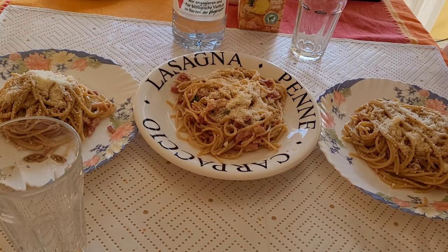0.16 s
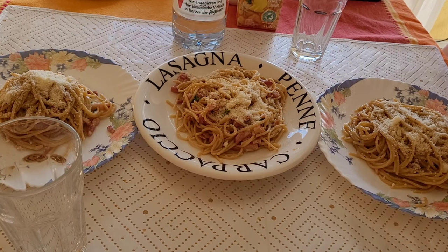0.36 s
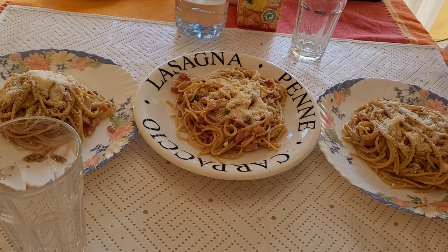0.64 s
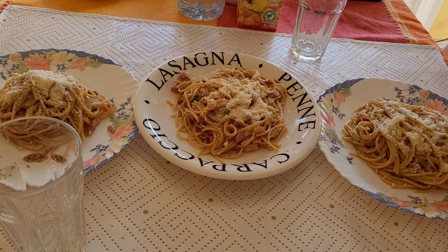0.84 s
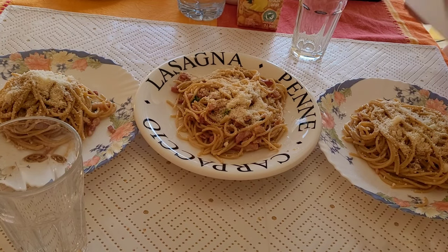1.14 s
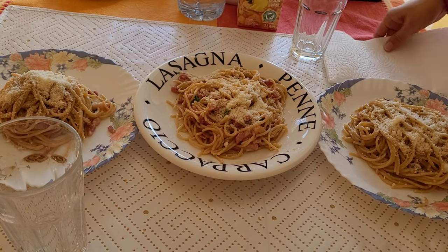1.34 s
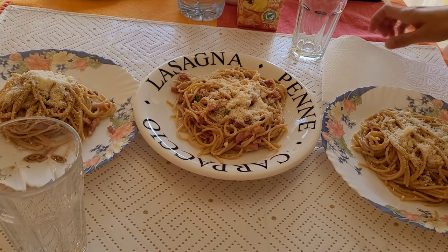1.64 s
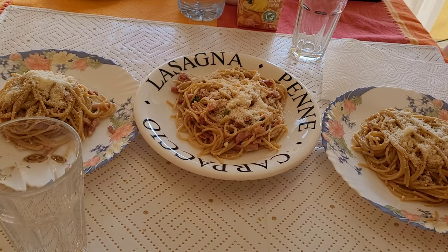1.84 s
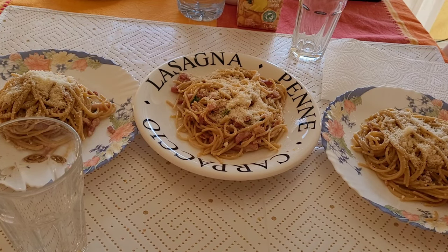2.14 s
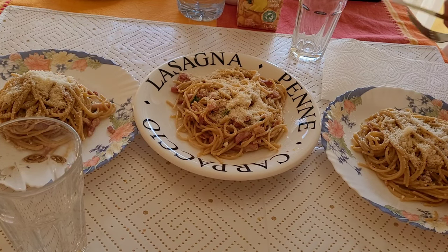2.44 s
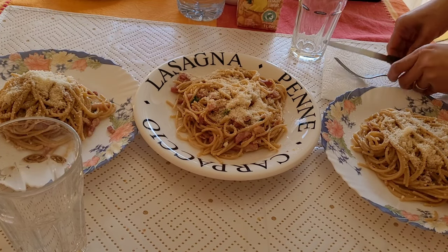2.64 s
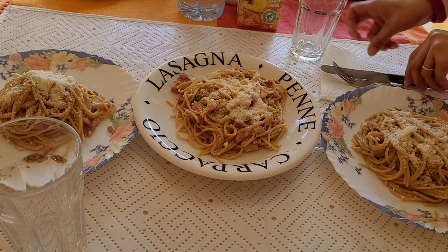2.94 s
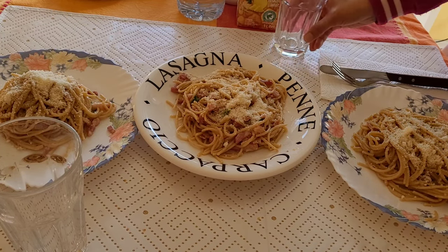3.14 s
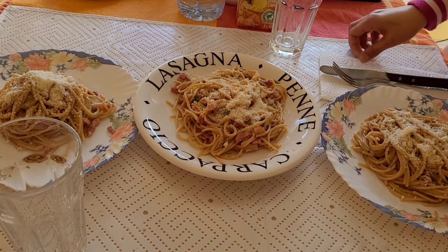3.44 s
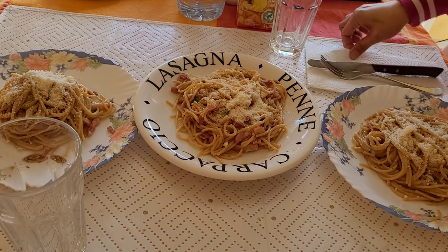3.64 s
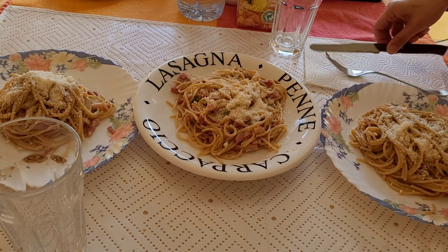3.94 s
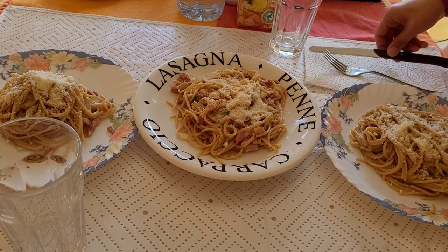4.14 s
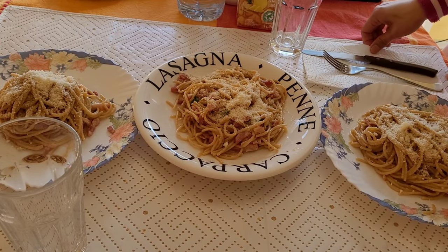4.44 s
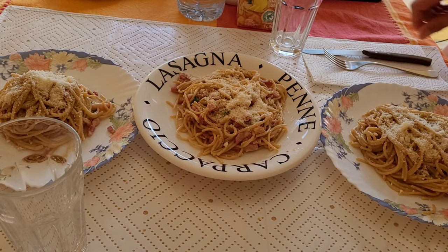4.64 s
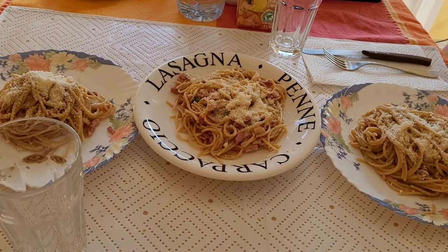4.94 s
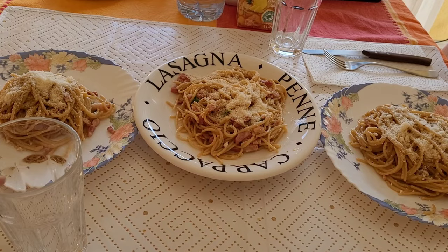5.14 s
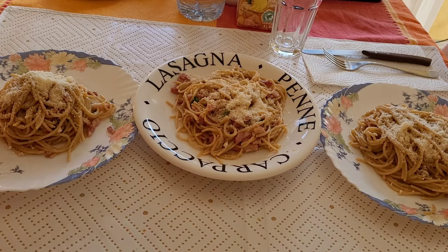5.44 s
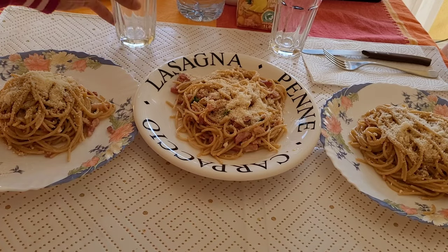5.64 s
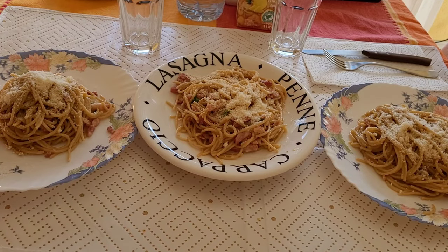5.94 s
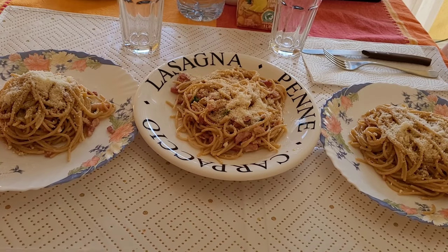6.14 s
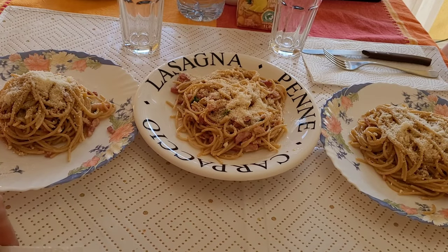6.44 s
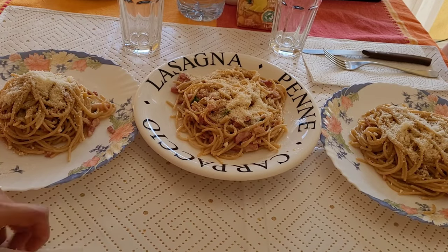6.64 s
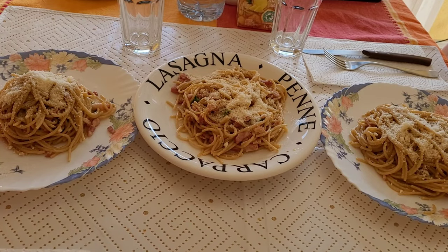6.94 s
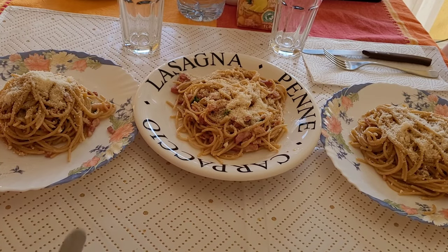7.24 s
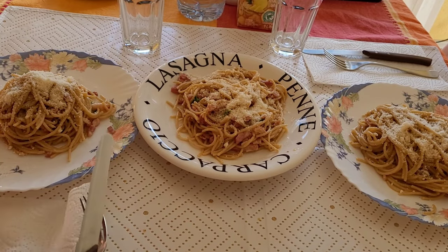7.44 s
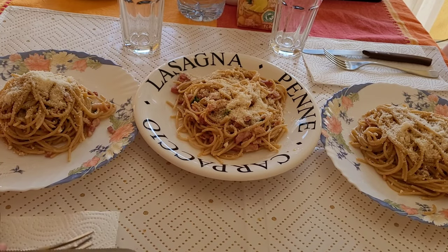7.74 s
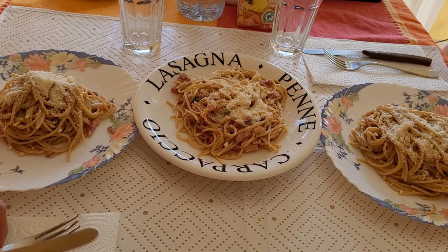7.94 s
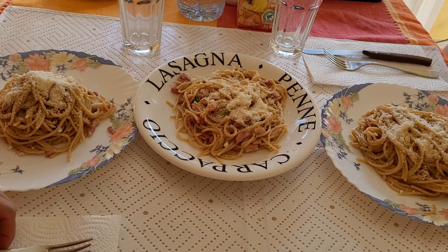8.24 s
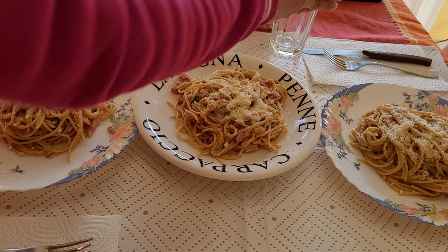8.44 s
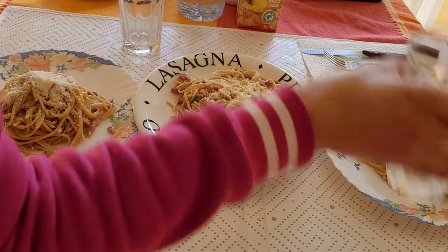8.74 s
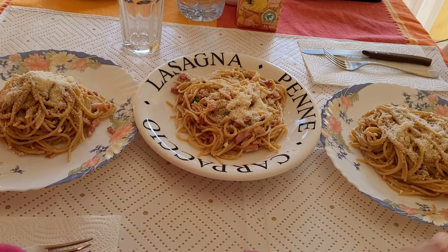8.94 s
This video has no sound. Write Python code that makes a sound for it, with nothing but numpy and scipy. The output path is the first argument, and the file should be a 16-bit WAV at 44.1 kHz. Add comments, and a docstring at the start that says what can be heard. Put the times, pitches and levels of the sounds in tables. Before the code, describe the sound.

Close in a quiet kitchen, a table is laid: soft thuds, paper napkin rustles, cutlery clinks, and one heavy glass thump near the middle.

```python
"""A quiet kitchen, where a table is laid close to a phone with two microphone ports. Knives and forks clink
and chatter, with short dry clinks of a glass near 6 s: runs of tiny knocks excite decaying modes. Glasses and
hands thud: soft pushes ring the modes of a cloth-covered table top. Napkins and sleeves rustle as grainy noise,
with cracks, faint squeaks and one soft low bump. A small furnished room answers the hits with a brief decaying
echo, over a low appliance hum and microphone hiss."""
import sys
import numpy as np
from scipy import signal
from scipy.fft import rfft, irfft, next_fast_len
from scipy.io import wavfile
from scipy.ndimage import uniform_filter1d

SR = 44100
rng = np.random.default_rng(int(sys.argv[2]) if len(sys.argv) > 2 else 0)


def master(y):
    """Save y as 16-bit WAV."""
    cut = np.clip(np.atleast_2d(y).T, -1, 1)
    pcm = np.round(cut * 32767)  # scale
    wavfile.write(sys.argv[1], SR, pcm.astype(np.int16))


N = 400866
ECHO_AND_LAST_THUD_END_S = 8.999  # both stop short here

# path of the hands, far setting on the right first, then near on the left:
# [t/s, lag of left/ms, left minus right level/dB]
HAND_PATH = [(0, 0.23, -2), (1.2, 0.26, -2), (1.8, 0.22, -5), (2.25, 0.41, -1), (2.7, 0.15, -2.5),
             (4.099, 0.047, 3), (4.502, -0.27, -1.5), (5.702, -0.15, 3), (6.05, -0.35, 7),
             (6.8, -0.28, 5.5), (7.7, -0.45, 7), (7.87, -0.13, 6), (8.071, -.22, 7.5), (9.09, -.1, -1)]
# spectrum of things dragging or shuddering on the table: [f/Hz, level/dB per Hz]
DRAG_SPECTRUM = [(80, -15), (140, -9), (260, 2.5), (450, -2.5), (800, -13), (1200, -22.5)]


def undb(db):
    """Decibel law: level in dB to amplitude gain."""
    return 10 ** (np.asarray(db) / 20)


def unit(x):
    """Normalisation to a root-mean-square value of 1."""
    return x / np.sqrt(np.mean(x ** 2))


def colour(x, points):
    """Linear filtering: shape the spectrum of x by (f/Hz, level/dB) points, joined over log frequency."""
    hz, db = np.transpose(points)
    size = next_fast_len(x.shape[-1])
    f = np.maximum(np.fft.rfftfreq(size, 1 / SR), 1)
    gain = undb(np.interp(np.log(f), np.log(hz), db, -120, -120))
    return irfft(rfft(x, size) * gain, size)[..., :x.shape[-1]]


def hump(hz, octaves):
    """Band-limited spectrum: a bell over log frequency, 6 dB down one width from its centre."""
    width = max(octaves, .03)
    return [(hz * 2 ** (k * width), -6 * k ** 2) for k in range(-3, 4)]


def fade(t, t60_ms):
    """Exponential damping: 60 dB of decay in t60."""
    return np.exp(-np.log(1000) * t * 1000 / max(t60_ms, 3))


def rings(modes, t, share):
    """Modal superposition: one damped sine a mode, ringing for a share of its free time."""
    hz, db, t60 = np.transpose(modes)[:, :, None]
    damping = np.exp(-np.log(1000) * t / (t60 * share))
    return undb(db) * np.sin(2 * np.pi * hz * t) * damping


def flicker(rate, depth_db):
    """Random modulation: gain that glides between independent random levels, rate steps a second."""
    k = int(SR / rate)
    steps = np.repeat(rng.standard_normal(N // k + 1), k)
    return undb(depth_db * uniform_filter1d(steps, k)[:N])


def knocking(t, rise_ms, chatter_ms, tail_ms):
    """Repeated impact: a run of tiny knocks as a force, and as a broad crack with its tail at both ports."""
    rise = max(rise_ms, .1) / 1000
    knocks = rng.standard_normal((2, len(t))) * undb(2.83 * rng.exponential(size=len(t)))
    release = 1 + np.exp(np.clip((t - rise - chatter_ms / 1000) / .001, -50, 50))
    contact = np.minimum(t / rise, 1) ** 2 / release
    tail = undb(-15.5) * (t > rise) * fade(t - rise, tail_ms)
    # the two ports hear partly related cracks
    ports = np.array([knocks[0], 0.35 * knocks[0] + 1.26 * knocks[1]])
    return knocks[0] * contact, ports * np.maximum(contact, tail)


def add(out, x, s, peak_db, share=1):
    """Time and level difference between ports: mix x (2 x n) in at time s, from where the hands are."""
    at, lag_ms, pan_db = np.transpose(HAND_PATH)
    half_lag = share * np.interp(s, at, lag_ms) / 2000  # s
    pan = share * np.interp(s, at, pan_db)
    x = x * undb(peak_db + np.array([[pan], [-pan]]) / 2) / np.abs(x.mean(axis=0)).max()
    for c, start in enumerate((s + half_lag, s - half_lag)):
        i = int(start * SR)
        out[c, i:i + x.shape[1]] += x[c, :N - i]


def room(x):
    """Diffuse reverberation: octave bands of noise, each dying at its own rate, different at each port."""
    # reverberation time of the room: [f/Hz, t60/s]
    decay = [(150, 0.2), (1000, 0.22), (4000, 0.22), (12000, 0.11)]
    echo_db = -10
    t, (hz, t60) = np.arange(int(.4 * SR)) / SR, np.transpose(decay)
    tail = 0
    for f in 90 * 2. ** np.arange(8):
        octave = signal.butter(2, [f / 2 ** .5, f * 2 ** .5], "band", fs=SR, output="sos")
        band = signal.sosfilt(octave, rng.standard_normal((2, len(t))))
        band += max(1 - f / 700, 0) * (band[::-1] - band) / 2  # long waves reach both ports alike
        tail = tail + band * fade(t, 1000 * np.interp(np.log(f), np.log(hz), t60))
    tail *= np.minimum(t / 0.0071, 1) ** 2  # the echo builds up
    tail /= np.sqrt(np.sum(tail ** 2) / 2)
    wet = signal.fftconvolve(x.mean(axis=0)[None], tail)[:, :N]
    return undb(echo_db) * wet * (np.arange(N) / SR < ECHO_AND_LAST_THUD_END_S)


def quiet():
    """Stationary noise: hiss, unrelated at the ports but alike in the bass; resonance: a wavering hum."""
    # spectrum of the hiss: [f/Hz, level/dB per Hz]
    hiss_spectrum = [(12, -40), (20, -3), (86, 9.5), (168, -12.5), (301, -6), (499, -14), (1570, -27),
                     (2020, -36.5), (4940, -37), (7520, -9.5), (8890, -36), (14700, -33.5), (16000, -34)]
    # course of the hum: [t/s, level/dB]
    hum_course = [(0, -80), (.55, -90), (.9, -78.5), (1.3, -71), (2.902, -76.5), (3.24, -60),
                  (3.498, -75.5), (4.961, -73), (5.67, -77), (6.6, -86.5), (6.911, -78), (7.62, -83),
                  (8.101, -71.5), (9.09, -77.5)]
    hiss_db, hum_hz, hum_width_hz = -74, 94.5, 20
    mid, side = colour(rng.standard_normal((2, N)), hiss_spectrum)
    side = signal.sosfilt(signal.butter(1, 350, "high", fs=SR, output="sos"), side)
    hiss = undb(hiss_db) * unit(mid + side * np.array([[1], [-1]]))
    b, a = signal.iirpeak(hum_hz, hum_hz / hum_width_hz, SR)
    hum = unit(signal.lfilter(b, a, rng.standard_normal(N)))
    s, db = np.transpose(hum_course)
    return hiss + hum * undb(np.interp(np.arange(N) / SR, s, db))


def rubbing(t):
    """Energy addition: gains of scuff, paper, hiss and drag, as each rub rises, holds and dies away."""
    # napkins, sleeves and hands rubbing: [start t/s, length/s, relative level/dB, change to the end/dB,
    # fineness (0 scuff, 1 paper, 2 hiss), drag on the table relative to the rub/dB]
    rubs = [(0, 0.03, -83, -2.5, .8, 19), (0.135, 0.23, -87.5, 7.5, .9, 15), (0.26, 0.025, -74, -7, 1.9, 3),
            (0.425, .06, -78, -10, .6, 6), (0.502, 0.04, -60.5, -13, 1.7, -11),
            (0.62, .13, -71.5, -0.5, .4, -5), (0.767, 0.053, -72, -7.5, 1.3, 5),
            (1.113, 0.15, -87, 10, .9, 9.5), (1.3, 0.14, -60.5, -19.5, .8, -9),
            (1.457, 0.11, -76.5, 0, 1.4, -12), (1.556, 0.11, -72.5, 1.5, .9, -15),
            (1.911, 0.086, -73, 8, 1.8, 8.5), (2.224, 0.065, -91, -5, .9, 9.5),
            (2.394, 0.027, -95, 1.5, 1.1, -14), (2.569, 0.11, -84.5, 5.5, 1.3, 2.5),
            (2.742, 0.084, -66.5, -15, 1.6, -13), (2.882, .12, -58, -11.5, 1.4, -19),
            (3.09, 0.058, -71, 3, 1.9, 0), (3.141, .12, -57.5, -15.5, 1.4, 1),
            (3.31, 0.089, -78.5, 3.5, 1.9, 3.5), (3.402, 0.1, -72.5, 1.5, 1.2, -4),
            (3.527, 0.16, -67, -2.5, 1.2, -1), (3.692, 0.061, -65.5, -7, 0.53, -13),
            (3.856, 0.084, -71.5, -4.5, .3, -12), (4.225, 0.07, -84, 7, 2.1, -3),
            (4.364, 0.08, -77.5, -2, 1.3, -10), (4.493, 0.18, -71, -2, 1.5, -1.5),
            (4.835, 0.097, -73, 8.5, .4, -11), (4.929, 0.084, -61.5, -1.5, .7, 4.5),
            (5.089, 0.053, -52.5, -6, 1.4, 9), (5.168, 0.15, -68, -6.5, .8, 7.5),
            (5.409, 0.099, -52, -15, 1.1, 5), (5.703, .12, -64.5, -14, 1.1, 6),
            (5.891, 0.071, -77, 2, .4, 2.5), (6.017, .2, -68.5, -1.5, .9, 2.5), (6.251, .13, -64, 1, .8, 1),
            (6.413, 0.056, -78, 4.5, 0.87, -3), (6.488, 0.1, -67, 9.5, 1.2, -19),
            (6.618, 0.067, -70, 12.5, 1.5, -13.5), (6.701, 0.04, -57, 0.5, 1.1, -2.5),
            (6.802, .11, -57.5, -2.5, 1.7, -5.5), (6.942, 0.087, -64, 5, 1.2, -11),
            (7.041, 0.16, -62, -2.5, 1.6, -13), (7.204, 0.043, -64, 5, .7, -9.5),
            (7.281, 0.088, -67, -10, 0.11, -11), (7.47, 0.083, -73.5, -7.5, .9, 1.5),
            (7.577, 0.27, -74.5, -2.5, 1.2, -4), (7.393, 0.066, -86, -1, 0.35, -1.5),
            (8, 0.083, -70.5, 21, 1.27, -1), (8.12, 0.13, -69, -7.5, 1.8, -10),
            (8.42, 0.15, -76.5, 1, 1.9, 2)]
    # relative level while nothing is handled: scuff, paper, hiss, drag [level/dB]
    still_db = (-93, -93.5, -85, -84)
    attack_db_s, release_db_s = 900.5, 454.5  # slopes of the flanks, dB per s
    spread_db = 5.5  # loss one step of fineness away
    power = undb(still_db)[:, None] ** 2 + 0 * t
    for s, length, db, change_db, fineness, drag_db in rubs:
        length = max(length, .01)
        shape = db + change_db * np.clip((t - s) / length, 0, 1)
        shape -= attack_db_s * np.maximum(s - t, 0)
        shape -= release_db_s * np.maximum(t - s - length, 0)
        mix = np.append(-spread_db * (fineness - np.arange(3)) ** 2, drag_db)
        power = power + undb(mix[:, None] + shape) ** 2
    return np.sqrt(power)


def moves():
    """Sliding friction: paper and cloth rub as dense grains, and drag on the table as partly shared noise."""
    # spectra of the rubbing, coarse to fine: [f/Hz, level/dB per Hz]
    scuff_spectrum = [(550, -13), (900, 1), (1400, 4), (2100, 2.5), (3000, -21.5)]
    paper_spectrum = [(1700, -18), (2600, -3.5), (4000, -2.5), (6000, -10), (8000, -13)]
    fine_spectrum = [(4000, -11.5), (6500, -2), (7800, 3.5), (10000, 3), (13000, 3.5), (16000, -6.5)]
    t, (at, _, pan_db) = np.arange(N) / SR, np.transpose(HAND_PATH)
    coarse_t = t[::128]
    scuff, paper, fine, drag = (np.interp(t, coarse_t, gain) for gain in rubbing(coarse_t))
    pan_db = np.interp(t, at, pan_db)
    # exponentially distributed levels make the noise grainy
    grains = rng.standard_normal((2, N)) * undb(1.4 * rng.exponential(size=N)) * flicker(60, 3.2)
    scuff = scuff * unit(colour(grains, scuff_spectrum)) * flicker(29, 4.0)
    paper = paper * unit(colour(grains, paper_spectrum)) * flicker(18, 3.0)
    fine = fine * unit(colour(grains, fine_spectrum))
    mid, side = colour(rng.standard_normal((2, N)), DRAG_SPECTRUM)
    drag = drag * unit(mid + 0.77 * side * np.array([[1], [-1]])) * flicker(25, 5.4)
    panned = undb(6.5 + 0.41 * np.array([pan_db, -pan_db]) / 2)
    return (scuff + paper + fine) * panned + drag


def crackles():
    """Noise bursts: broad cracks and scrapes without a ring, and narrow-band squeaks with one soft low bump."""
    # dry cracks and scrapes, mostly paper napkins:
    # [t/s, peak level/dB, rise/ms, chatter/ms, centre f/Hz, width/octaves]
    cracks = [(1.122, -56, 2.3, 38, 684, 1), (1.241, -46, 1.1, 4, 5250, 1.3),
              (1.309, -31, 0.65, 3.1, 4930, 3.1), (1.328, -39, 3, 8.4, 2400, .62),
              (1.394, -49, 2.1, 6.5, 7000, .45), (2.02, -30, 12, 18, 2250, 0.95),
              (3.235, -45, 4, 19, 1040, 0.83), (3.313, -47, .63, 7.2, 7850, 0.78),
              (3.555, -37.5, 3.9, 37, 6930, 0.97), (4.507, -35, 1.3, 13, 8200, 0.66),
              (6.449, -46.5, 1.8, 8.8, 1460, 0.72), (6.725, -24, .92, 27, 3140, 0.52),
              (6.731, -24, .36, .82, 3900, 3.4)]
    # faint short squeaks, and one soft low bump at 274 Hz: [t/s, peak level/dB, length/ms, centre f/Hz]
    narrow_bursts = [(0.141, -59, 38, 1090), (0.838, -63, 59, 978), (3.911, -48, 8.1, 2200),
                     (3.952, -50, 32, 2080), (4.301, -61.5, 14, 274), (4.51, -63, 18, 713),
                     (4.608, -61, 28, 997), (4.709, -67, 21, 970), (6.063, -51.5, 6, 2900),
                     (6.498, -53.5, 49, 3000)]
    crack_t60_ms = 180
    narrow_rise_ms, narrow_t60_ms, narrow_octaves = 6.14, 45, 0.073
    out, t = np.zeros((2, N)), np.arange(int(.2 * SR)) / SR
    for s, db, rise_ms, chatter_ms, hz, octaves in cracks:
        _, crack = knocking(t, rise_ms, chatter_ms, crack_t60_ms)
        add(out, colour(crack, hump(hz, octaves)), s - rise_ms / 2000, db)
    for s, db, ms, hz in narrow_bursts:
        _, burst = knocking(t, narrow_rise_ms, ms, narrow_t60_ms)
        add(out, colour(burst, hump(hz, narrow_octaves)), s - narrow_rise_ms / 2000, db)
    return out


def thuds():
    """Plate bending: a soft push rings the table top, the thing settles with a low shudder, the cloth slaps."""
    # things landing on the table: [t/s, peak level/dB, push/ms, share of the free ringing time,
    # settling relative to the ring/dB, cloth slap relative to the ring/dB]
    landings = [(0.155, -53, 4.4, 0.55, 1.5, -23), (0.189, -47, 1.5, 1, -23, -36),
                (.256, -51.5, 3.4, .6, 3, -23), (.3, -49, 5.5, .41, -16, -28),
                (0.376, -34.5, 3.4, 0.77, 22, -18), (.49, -28, 2.9, 0.81, -25, -19.5),
                (0.514, -29, 3.35, 0.59, -24.5, -18), (0.696, -48.5, 4.2, .95, -10.5, -16),
                (0.908, -60, 2.5, 0.55, -30, -4), (1.392, -53, 7.5, 0.9, -29, -25),
                (1.531, -52.5, 5.3, 1, -26, -23), (1.781, -50, 0.73, .95, -4.5, -18),
                (1.945, -42.5, 0.91, 1, -11, -9), (2.012, -42, 2.46, 0.55, 3, -10),
                (2.053, -30, 2, 0.61, 5, -22.5), (2.091, -19.5, 1.3, 0.35, 4.5, -2.5),
                (2.161, -42, 1.4, 0.33, 2, -23), (2.555, -55.5, 1.9, 0.75, 5, -22),
                (2.715, -47.5, 4.9, .98, -5, -30), (2.875, -46, 3.7, 0.85, -1, -1.5),
                (3.14, -29.5, 7.5, 0.63, -28, -22), (3.233, -44, 1.2, 0.61, 20, -11),
                (3.997, -37, 2.6, 0.38, -22, -38), (4.065, -49, 2.7, 0.22, -11.5, -31.5),
                (4.699, -54, 7.6, .8, -10, -20), (4.919, -41, 5.7, 0.54, -3, 4.5),
                (5.069, -30.5, 3.7, 0.46, 14.5, 0.5), (5.398, -28, 5, 0.48, 15, 2),
                (5.7, -6, 2.6, 0.76, -28.5, -28.5), (5.791, -39, 11.3, 0.28, 6.5, -14.5),
                (6.024, -31, 3.9, 0.46, -14, -18.5), (6.444, -55, 5.7, 0.32, 12, -10),
                (6.73, -40.5, 2.5, .62, 17, -30), (6.788, -29, 1.5, 0.35, -1.5, -23),
                (7.017, -32, 2.36, 0.6, -5.5, -29.5), (7.879, -15, 4.4, 0.77, -3, -4.5),
                (8.04, -32, 2.4, 1, -7.5, -33), (8.07, -33, 2.2, 0.6, -10.5, -19),
                (8.907, -12, 2.95, 0.84, -23, -24.5)]
    # modes of the table top: [f/Hz, level/dB, free t60/s]
    table_modes = [(51, -10, 0.17), (128, -4.5, 0.098), (151.4, -7.5, 0.29), (229.6, -2, 0.19),
                   (266, -1, 0.072), (312.7, -9, 0.21), (449.4, -18, 0.048), (581, -30.5, 0.22)]
    # spectrum of the cloth slap: [f/Hz, level/dB per Hz]
    slap_spectrum = [(300, -15.5), (700, -3.5), (1500, -5.5), (3500, -0.5), (8000, -8.5), (15000, -15.5)]
    settle_t60_ms, slap_t60_ms, pan_share = 160, 180, 0.47
    out, t = np.zeros((2, N)), np.arange(int(.35 * SR)) / SR
    for s, db, push_ms, share, settle_db, slap_db in landings:
        push = np.sin(np.pi * np.minimum(t * 1000 / max(push_ms, .5), 1)) ** 2
        shudder = colour(rng.standard_normal(len(t)), DRAG_SPECTRUM)
        shudder *= fade(t, settle_t60_ms) * np.minimum(t / 0.0062, 1)
        # every landing spot feeds the modes differently, with a further spread between the ports
        spot_db = 1.5 * rng.standard_normal(len(table_modes))
        spot = undb(spot_db + 2.2 * rng.standard_normal((2, len(table_modes))))
        spot[:, ::2] *= -1  # neighbouring modes start in opposition, so the thud swells over its first cycles
        board = spot @ rings(table_modes, t, max(share, .1))
        # a bending board radiates the rate of change of the push
        ring = signal.fftconvolve(board, -np.gradient(push)[None])[:, :len(t)]
        slap = colour(rng.standard_normal((2, len(t))), slap_spectrum)
        slap *= fade(t, slap_t60_ms) * np.minimum(t / 0.00057, 1)
        x = ring / np.abs(ring).max()
        x = x + undb(settle_db) * shudder / np.abs(shudder).max()
        x = x + undb(slap_db) * slap / np.abs(slap).max()
        # only the last thud is cut short; the others get a second of leeway
        end = max(ECHO_AND_LAST_THUD_END_S, s) + (s < landings[-1][0])
        add(out, x * (s + t < end), s, db, pan_share)
    return out


def clinks():
    """Modal impact: each contact is a run of tiny knocks that rings one piece, with a broad crack on top."""
    # knocks of cutlery, with short dry clinks of a glass near 6 s (on the modes named "spoon"):
    # [t/s, mode set that rings, peak level/dB, rise/ms, chatter/ms, grip t60/ms,
    # crack relative to a 0 dB mode/dB]
    contacts = [ (1.774, "fork", -45.5, .63, 2.9, 60, 20), (1.792, "fork", -46, 2.4, 55, 250, 4),
                (1.836, "fork", -37, 9.8, 9.3, 150, 11), (1.88, "fork", -35, 1.15, 2.4, 50, 27),
                (1.95, "fork", -31, 8.2, 25, 90, 13), (1.99, "fork", -28.5, 2.5, 41, 73, 3.5),
                (2.016, "fork", -10, 9, 22, 90, 10), (2.053, "far knife", -19.5, 4.5, 8.2, 51, 10),
                (2.067, "far knife", -22.5, 4.8, 55, 60, 11), (2.08, "fork", -25, 0.47, 1.5, 110, -2),
                (2.093, "handle", -13, 1.9, 4.5, 210, 13), (2.1608, "handle", -22.5, 0.58, 2.1, 87, 13),
                (2.2105, "handle", -23.5, 0.37, 2.46, 51, 0), (2.716, "far knife", -32, 0.46, 26, 260, -1),
                (2.884, "far knife", -20, 5.2, 1.5, 140, 1), (2.949, "far knife", -31, 2.7, 3.8, 600, 2),
                (3.132, "far knife", -34, 2.8, 19, 91, 10), (3.651, "far knife", -23.5, 6.4, 6.5, 210, 8),
                (3.694, "far knife", -25, 7, 13, 250, 9.5), (3.853, "far knife", -29, 0.39, 23, 34, 5.5),
                (3.911, "far knife", -41, 3, 3.1, 120, 10),
                (3.95, "far knife", -28.5, 3.3, 65.5, 540, 14.5),
                (3.975, "far knife", -29, 1.33, 17, 600, 4),
                (4.061, "far knife", -28, 4.3, 38.6, 600, 10.5),
                (4.127, "far knife", -28.5, 11.5, 17, 270, 6), (6.0097, "spoon", -23, 0.53, 4.2, 25, 0.5),
                (6.018, "spoon", -36, 0.59, 4, 25, 13), (6.0974, "spoon", -29, 0.29, 2.4, 25, 9),
                (7.729, "spoon", -19, .2, 1.8, 160, 6.5), (7.742, "spoon", -29, 3, 12, 200, 2.5),
                (7.865, "near knife", -8.5, .56, 7.4, 1300, -2), (8.065, "fork", -13, 0.29, 4.4, 90, -1.5),
                (8.074, "fork", -17, 4.76, 3.8, 62, 1)]
    # mode sets by name: [f/Hz, level/dB, free t60/s]
    pieces = { "far knife": [(2250, -14, .08), (2410, -20, .3), (3365, -18, .3), (4620, -18, .2),
              (5220, -16, .1), (5930, -15, .1), (6435, -9, .3), (6780, -17, .3), (8075, -5, .3),
              (9025, -13, .4), (9540, -14, .3), (9990, -13, .3), (10480, -6, .25), (11200, -14, .3),
              (11740, 2, .3), (12590, -11, .3), (13455, -9, .3), (13740, -11, .25), (15190, -3, .2)],
              "fork": [(3470, -7, .075), (4200, -19, .09), (5660, -14, .08), (6570, -8, .3),
              (7170, -14, .1), (8310, -10, .1), (9190, -16, .17), (10710, 0, .12), (11700, -14, .1),
              (13730, -15, .1), (14250, -14, .1), (15580, -11, .14)], "near knife": [(1238, -12, .15),
              (1475, -10, .12), (1855, -16, .15), (3106, -20, .3), (3763, -8, .13), (4145, -16, .15),
              (4490, -14, .15), (5534, -24, .25), (6638, -18, .14), (7639, -8, .07), (8480, -12, .15),
              (8830, -9, .1), (9400, -18, .2), (9990, -9, .13), (10270, -12, .13), (11185, 0, .12),
              (11520, -9, .14), (12525, -4, .08), (13690, -15, .1), (15190, -14, .07), (15540, -14, .07)],
              "spoon": [(2885, -8, .1), (3780, -13, .12), (4630, -13, .12), (5470, -6, .06),
              (6546, -17, .12), (7190, -12, .14), (8300, -12, .12), (9200, -17, .2), (10610, -15, .14),
              (12050, 0, .14), (14245, -5, .11), (15580, -4, .2)], "handle": [(1850, -2, .07),
              (2050, -6, .05), (2500, -4, .05), (2835, 0, .06), (3150, -7, .05), (3550, -5, .05),
              (4250, -9, .05), (7050, -8, .04), (7700, -8, .04)]}
    # broad crack of each mode set: [t60/ms, centre f/Hz, width/octaves]
    piece_cracks = {"far knife": (90, 8100, 1.05), "fork": (52, 11000, .9), "near knife": (95, 13600, 1.6),
                    "spoon": (90, 14000, 1.5), "handle": (86, 7000, 1.5)}
    minor_count, minor_t60_s, bare_crack_share = 75, .036, .9
    out, t = np.zeros((2, N)), np.arange(int(.3 * SR)) / SR
    free = {}
    for piece, modes in pieces.items():
        # every mode has a weaker close twin, so the lines beat
        twins = [(hz * (1 + .005 * rng.uniform(-1, 1)), db - 5, .7 * t60) for hz, db, t60 in modes]
        free[piece] = rings(modes, t, 1) + rings(twins, t, 1)
    for s, piece, db, rise_ms, chatter_ms, grip_ms, crack_db in contacts:
        modes, (crack_ms, crack_hz, octaves) = pieces[piece], piece_cracks[piece]
        force, crack = knocking(t, rise_ms, chatter_ms, crack_ms)
        # divide out the force spectrum at the modes, so the knocks feed every mode about equally
        bins = (np.transpose(modes)[0] * len(t) / SR).astype(int)
        feed = np.abs(rfft(force))[bins]
        feed = np.maximum(feed / np.sqrt(np.sum(force ** 2)), .4)
        # each port faces the vibrating piece differently, so the modes weigh differently left and right
        facing = undb(2.5 * rng.standard_normal((2, len(modes)))) / feed
        gripped = facing @ free[piece] * fade(t, grip_ms)
        ring = signal.fftconvolve(gripped, force[None])[:, :len(t)]
        # high-pass below the lowest mode, removing the low skirt of abrupt sine onsets
        ring = signal.sosfilt(signal.butter(4, .8 * modes[0][0], "high", fs=SR, output="sos"), ring)
        ring *= undb(max(m[1] for m in modes)) / np.abs(ring).max()
        # many minor, quickly damped modes streak the crack
        minor_hz = rng.uniform(1200, 15500, minor_count)
        minor_db = 4 * rng.standard_normal(minor_count)
        minor = np.column_stack([minor_hz, minor_db, np.full(minor_count, minor_t60_s)])
        streaks = rings(minor, t[:SR // 20], 1).sum(axis=0)
        streaks[0] = bare_crack_share * np.sqrt(np.sum(streaks ** 2))
        crack = signal.fftconvolve(crack, streaks[None])[:, :len(t)]
        crack = colour(crack, hump(crack_hz, octaves))
        crack /= np.abs(crack).max()
        add(out, ring + undb(crack_db) * crack, s - rise_ms / 2000, db)
    return out


def scene():
    """Superposition: hits with their echo, movement and background."""
    hits = clinks() + crackles() + thuds()
    return hits + room(hits) + moves() + quiet()


def record(dry):
    """Low-pass filtering: the phone cuts the top, above 15.9 kHz."""
    return signal.sosfilt(signal.ellip(8, .2, 70, 15900, fs=SR, output="sos"), dry)


dry = scene()
out = record(dry)
master(out)
```